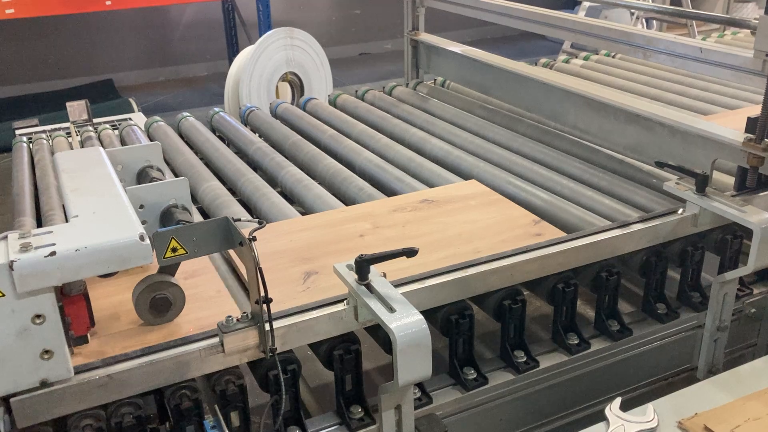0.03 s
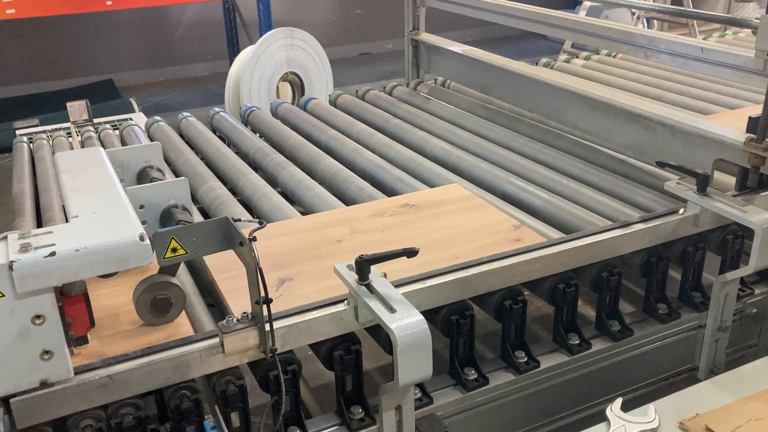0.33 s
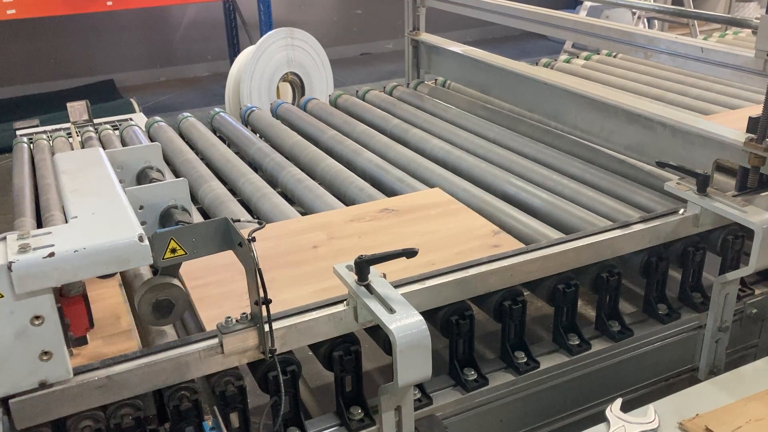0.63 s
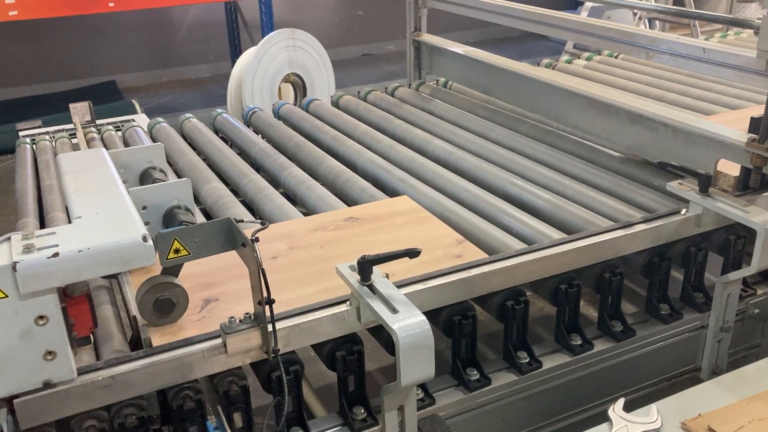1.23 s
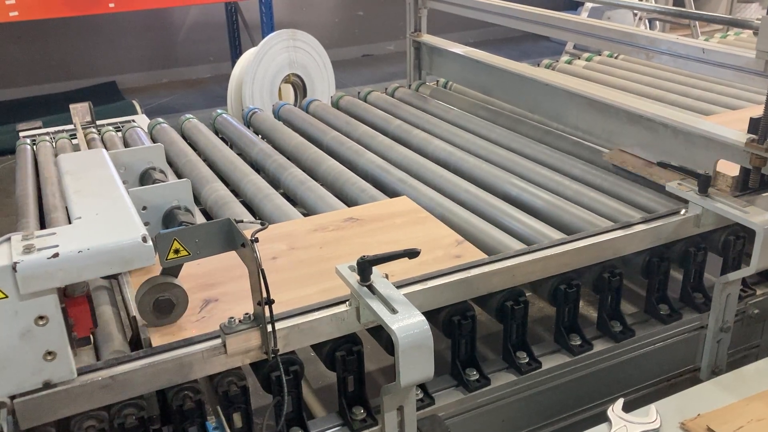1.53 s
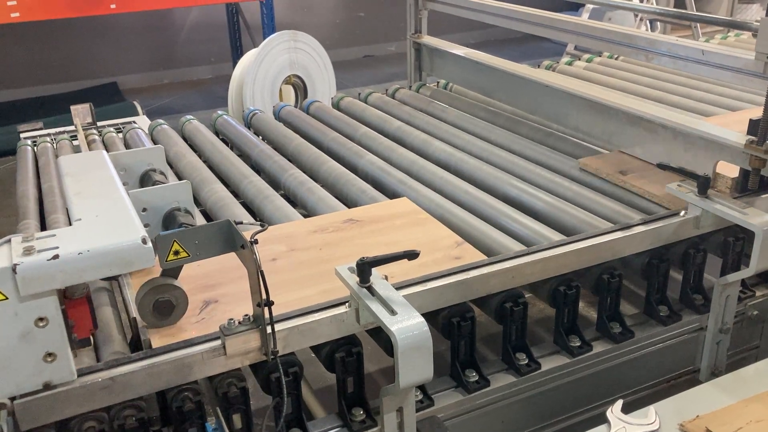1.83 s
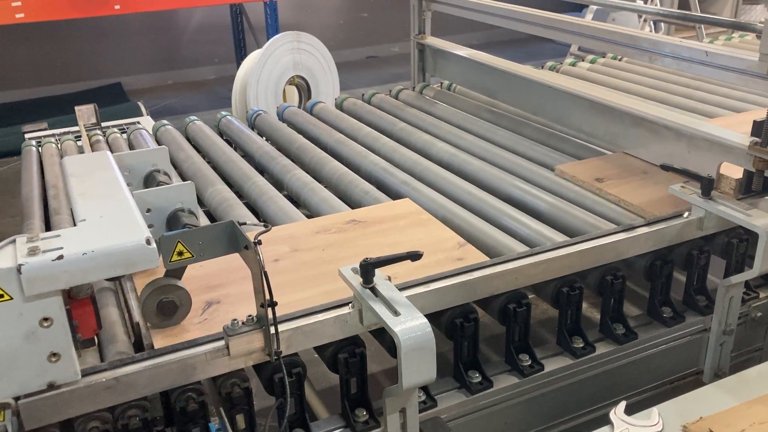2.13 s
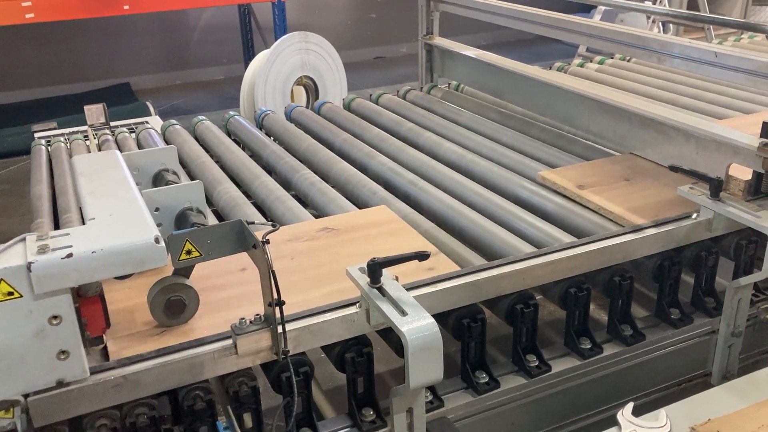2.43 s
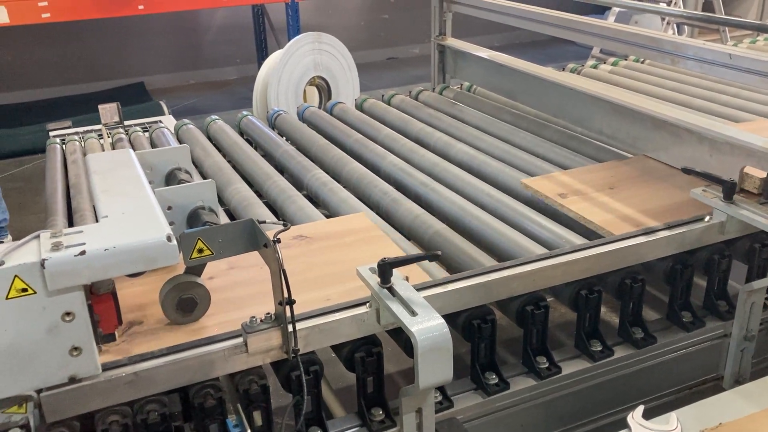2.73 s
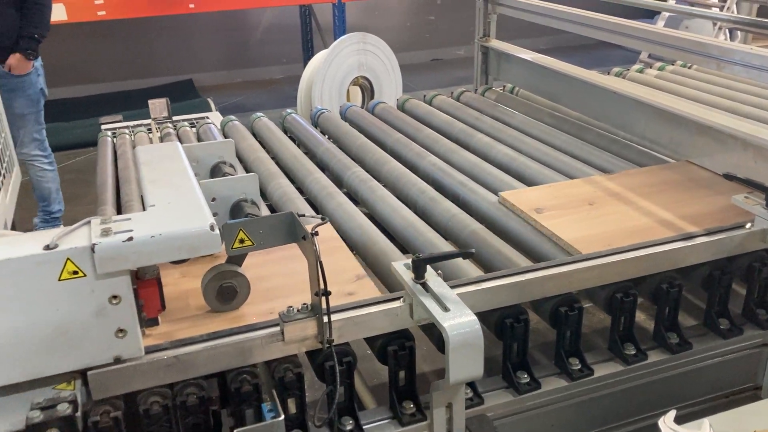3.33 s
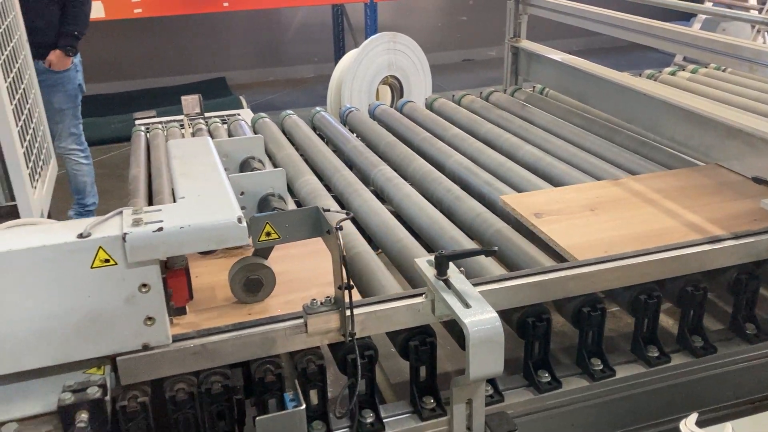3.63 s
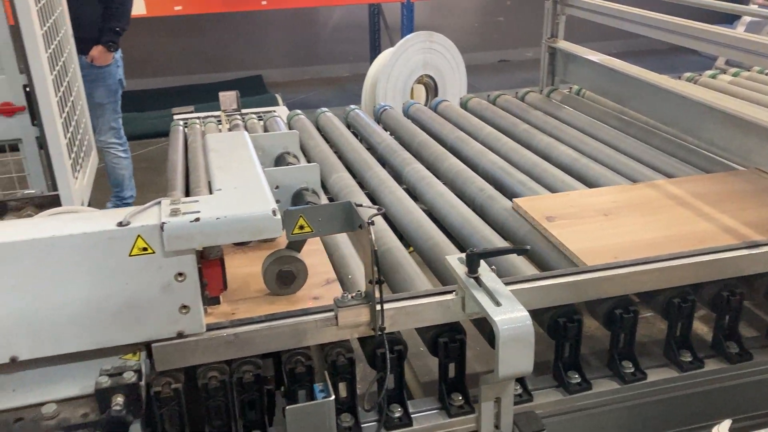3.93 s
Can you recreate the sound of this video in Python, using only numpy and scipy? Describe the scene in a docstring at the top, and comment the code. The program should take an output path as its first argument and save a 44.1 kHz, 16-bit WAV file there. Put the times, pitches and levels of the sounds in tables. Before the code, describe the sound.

A conveyor roller squeals unevenly after a brief scrape and snap, while factory machinery drones.

```python
"""A roller gives a thin, stuttering squeal on a factory machine that puts edging on panels.
It sings because it keeps gripping and slipping, and the hall echoes it. Just before it starts,
tools rub along a panel, then scrape and snap off its back edge. Later, panels bump on the conveyor.
The conveyor, the dust extractor and the motors drone throughout."""
import sys
import numpy as np
from scipy import signal
from scipy.fft import rfft, irfft
from scipy.io import wavfile
from scipy.ndimage import uniform_filter1d

SR = 44100
rng = np.random.default_rng(int(sys.argv[2]) if len(sys.argv) > 2 else 0)


def to_wav(sig):
    """Store sig (one row per channel, or 1-D mono) as 16-bit WAV at the path in sys.argv[1].

    Samples outside -1..1 are clipped; the rate is SR.
    """
    pcm = np.clip(np.atleast_2d(sig), -1, 1) * 32767
    pcm = np.round(pcm).astype(np.int16)
    wavfile.write(sys.argv[1], SR, pcm.T)  # frames by channels


N = 176400
T, HZ = np.arange(N) / SR, np.fft.rfftfreq(N, 1 / SR)


def amp(db):
    """Turns decibels into a gain to multiply by."""
    return 10 ** (np.asarray(db) / 20)


def unit(x):
    """Scales a signal to an average strength (rms) of 1."""
    return x / np.sqrt(np.mean(abs(x) ** 2) + 1e-20)


def level(points):
    """Gain over time from (t/s, level/dB) points."""
    return amp(np.interp(T, *np.transpose(points)))


def curve(points):
    """Joins (f/Hz, value) points along a log-frequency axis."""
    f, value = np.transpose(points)
    return np.interp(np.log(HZ + 1), np.log(f + 1), value)


def wander(rate_hz):
    """A smooth random wobble, up to about the given rate."""
    return unit(irfft(rfft(rng.standard_normal(N)) * (HZ > 0) / (1 + (HZ / rate_hz) ** 4), N))


def noise(gain):
    """Two unrelated noises with the given gain at each frequency."""
    return unit(irfft(rfft(rng.standard_normal((2, N))) * gain, N))


def decay(start, t60, attack_s):
    """A quick rise and a fade of 60 dB in t60 seconds."""
    age = np.maximum(T - start, 0)
    return np.minimum(age / attack_s, 1) * amp(-60 * age / t60)


def microphones(pair):
    """Blends two signals into left and right, partly alike and a little out of step."""
    # how alike the sides are: f/Hz, likeness (0 to 1)
    likeness = [(60, .998), (120, .98), (200, .92), (500, .7), (1000, .5), (1600, .3), (3500, .2),
                (6300, .25), (7200, .8), (9500, .98), (10400, .75), (11400, .95), (14300, .92)]
    # how far the left side is ahead: f/Hz, phase/rad
    lead = [(0, 0), (500, .7), (1000, 1.3), (1500, 2.7), (2900, 8.2), (3800, 8), (4800, 6.1), (5700, 3),
            (7100, 0), (9550, -3.7), (11400, -6.3), (14330, -10.3), (15600, -12.6)]
    left, other = rfft(pair)
    same = np.clip(curve(likeness), 0, 1)
    right = same * left + np.sqrt(1 - same ** 2) * other
    lag = np.exp(-1j * np.interp(HZ, *np.transpose(lead)))
    return irfft(np.array([left, right * lag]), N)


def hall(x, t60=0.66):
    """Two unrelated echoes of a sound, dying away in the hall."""
    tails = rng.standard_normal((2, SR // 2)) * amp(-60 * T[:SR // 2] / t60)
    return unit(signal.fftconvolve(x[None], tails, axes=1)[:, :N])


def machine_noise(spectrum, ripple_db, ripple_hz, patchy_db, flutter_db):
    """Noise coloured by the frame ringing at many pitches, fluttering in patches."""
    grid = np.arange(0, SR / 2, ripple_hz)
    ripple = np.interp(HZ, grid, rng.standard_normal(len(grid))) * HZ / (HZ + 300)
    steady = noise(amp(curve(spectrum) + ripple_db * ripple))
    slices = signal.stft(steady, nperseg=512)[2]
    patches = uniform_filter1d(rng.standard_normal(slices.shape[1:]), size=12, axis=0)  # blur in pitch
    patches = unit(uniform_filter1d(patches, size=6, axis=1))  # blur in time
    patchy = signal.istft(slices * amp(patchy_db * patches), nperseg=512)[1][:, :N]
    return unit(patchy * amp(flutter_db * wander(17)))


def drone():
    """The conveyor and the dust extractor make a steady rush."""
    # tone colour of the rush: f/Hz, level/dB
    colour = [(20, -35), (35, -19), (60, -5), (100, -8), (130, -6), (220, -0.5), (330, -5.5), (650, -6.5),
              (1000, -8.5), (1400, -10.5), (2300, -9.5), (3500, -12.5), (4500, -13.5), (5800, -20),
              (8500, -23), (11000, -20.5), (13000, -29), (15500, -54)]
    # its loudness: t/s, level/dB
    loudness = [(0, -24.5), (1.5, -27.5), (2.2, -28), (3, -28.5), (4, -29)]
    rush = machine_noise(colour, ripple_db=2.2, ripple_hz=22.3, patchy_db=1.5, flutter_db=0.16)
    return rush * level(loudness)


def motors(unload_s=0.64, easing_s=0.69):
    """Wavering motor tones, most easing off as the panel leaves the tools, and a fan's hum."""
    # motor tones: f/Hz, level/dB when working, level/dB when running free
    motor_tones = [(100, -50, -48.5), (199.1, -37, -43), (238.6, -36, -47.5), (358, -36, -50.5),
                   (451.8, -42.5, -49), (799, -38.5, -53), (1101.6, -33, -49.5), (1602, -47, -48.5),
                   (2450, -46, -76), (3999, -51, -72)]
    # the hum swells and sinks: t/s, level/dB
    fan_loudness = [(0, -43), (1.1, -48.5), (1.5, -39.5), (2.1, -44), (2.45, -39), (2.75, -49.5),
                    (3.1, -44.5), (3.55, -42), (4, -40.5)]
    fan_hz = 598.5
    free = np.clip((T - unload_s) / easing_s, 0, 1)
    tones = [(hz, amp(work_db + (free_db - work_db) * free)) for hz, work_db, free_db in motor_tones]
    out = np.zeros((2, N))
    for hz, gain in tones + [(fan_hz, level(fan_loudness))]:
        phase = 2 * np.pi * np.cumsum(hz * (1 + .001 * wander(5))) / SR
        flutter = amp(wander(4.8))  # about 1 dB
        out += gain * flutter * unit(np.array([np.sin(phase), np.cos(phase)]))
    return out


def panel_bumps():
    """Panels knock dully on the conveyor's rollers."""
    # knocks: t/s, level/dB
    knocks = [(2.761, -28), (3.777, -23), (3.789, -23.5), (3.822, -27)]
    # their tone colour: f/Hz, level/dB
    colour = [(25, -35), (60, -19), (150, -2), (250, 4.5), (600, -2), (1300, -2), (2500, -11), (5000, -20),
              (12000, -50)]
    return sum(amp(db) * decay(start, t60=0.29, attack_s=0.0024) * noise(amp(curve(colour)))
               for start, db in knocks)


def tool_rub():
    """The tools rub along the panel, then fade as it leaves."""
    # tone colour of the rubbing: f/Hz, level/dB
    colour = [(20, -26), (45, -7), (80, 1), (130, -5), (250, -2), (450, -4.5), (750, -8), (1200, -8),
              (1600, -6.5), (2600, -7), (4500, -14.5), (6000, -19), (8500, -24.5), (12000, -23),
              (15500, -35)]
    # its loudness: t/s, level/dB
    loudness = [(0, -22), (.3, -22), (.6, -21), (.77, -21), (.84, -26.5), (1.0, -27.5), (1.15, -26),
                (1.22, -33.5), (1.9, -44), (2.1, -111), (4, -81)]
    rub = machine_noise(colour, ripple_db=3.2, ripple_hz=25.06, patchy_db=1.95, flutter_db=0.93)
    return rub * level(loudness)


def scraper():
    """A scraper hisses along the edge in two quick bursts."""
    # tone colour of the hiss: f/Hz, level/dB
    colour = [(500, -21), (2000, -8), (4700, 8.5), (6000, -4.5), (8500, 0.5), (12000, -6), (15500, -5)]
    # its loudness: t/s, level/dB
    loudness = [(0, -55), (.57, -40), (.64, -17), (.69, -26.5), (.77, -18), (.84, -30), (.95, -35),
                (1.14, -39), (1.23, -49), (4, -75)]
    hiss = machine_noise(colour, ripple_db=-2.0, ripple_hz=80, patchy_db=2.9, flutter_db=4.5)
    return hiss * level(loudness)


def edge_snaps():
    """Tools strike the edge and chips flick away; the first blow sets the tool holder ringing."""
    # blows: t/s, level/dB, treble tilt/(dB per octave)
    blows = [(0.713, -18, -3), (.723, -15, 0.5), (.7842, -10.5, 7.5), (0.793, -23, 4), (0.894, -20, 0),
             (1.634, -28, 2), (2.103, -46, -3), (2.244, -29, 2), (2.545, -39, -1), (3.243, -29, 4)]
    # their tone colour before the tilt: f/Hz, level/dB
    colour = [(30, -35), (200, -10), (1000, 16), (3000, 8.5), (6000, 1), (11000, 2), (15500, -9.5)]
    # the holder's ringing tones: f/Hz, level/dB, t60/s
    holder_tones = [(3110, -24.5, 0.53), (3000, -22, 0.26), (4900, -15, .06)]
    out = np.zeros((2, N))
    for start, db, tilt_db in blows:
        body = decay(start, t60=0.064, attack_s=0.00026)
        tail = amp(-9) * decay(start, t60=0.11, attack_s=0.013)
        crack = amp(-4) * decay(start, t60=0.0042, attack_s=0.00017)
        burst = noise(amp(curve(colour) + tilt_db * np.log2(HZ + 500)))
        out += amp(db) * (body + tail + crack) * burst
    for hz, db, t60 in holder_tones:
        ring = np.sin(2 * np.pi * (hz * T + rng.random((2, 1))))
        out += amp(db) * decay(blows[0][0], t60, attack_s=.002) * ring
    return out


def faint_roller(hz=4193, jitter=0.0029):
    """A second roller joins in with a fainter, lower squeal."""
    # its loudness: t/s, level/dB
    loudness = [(0, -80), (1.7, -59), (2.0, -42), (2.75, -45), (3.3, -46), (4, -50)]
    tone = unit(np.sin(2 * np.pi * np.cumsum(hz * (1 + jitter * wander(33))) / SR))
    return unit((tone + hall(tone)) * amp(1.5 * wander(10))) * level(loudness)


def stick_slip(hz, drift=.0008, jitter=.0028, grit=.0035):
    """Phase of a rubbing roller whose pitch drifts and trembles."""
    speed = 1 + drift * wander(4.8) + jitter * wander(48.3) + grit * wander(420)
    return 2 * np.pi * np.cumsum(hz * speed) / SR


def chatter(rate_hz=13.3, depth_db=3):
    """A gain that pulses about once per turn of the roller, at an uneven rate."""
    phase = 2 * np.pi * np.cumsum(rate_hz * (1 + .25 * wander(5.1))) / SR
    return amp(depth_db * np.sin(phase))


def roller_squeal(hz=4779, rasp_db=-7, stutter_db=4.5):
    """A rubbing roller sings a raspy note with two overtones; its echoes beat against it."""
    # loudness of the note: t/s, level/dB
    note_loudness = [(.87, -58), (.92, -19.5), (1.02, -29.5), (1.08, -20.5), (1.14, -23), (1.185, -17),
                     (1.23, -26), (1.28, -20), (1.34, -22), (1.40, -16.5), (1.445, -29), (1.51, -22.5),
                     (1.59, -31.5), (1.635, -21), (1.75, -26.5), (1.79, -24), (1.9, -20), (1.96, -28),
                     (2.005, -16.5), (2.05, -30.5), (2.14, -26), (2.36, -26.5), (2.41, -36), (2.47, -17.5),
                     (2.505, -31.5), (2.54, -16.5), (2.575, -33), (2.65, -24), (2.74, -37), (2.83, -28.5),
                     (3.09, -30), (3.15, -26), (3.29, -25), (3.35, -35), (3.5, -25.5), (3.56, -31),
                     (3.74, -25), (3.88, -35.5), (3.97, -28.5), (4, -26)]
    # loudness of the overtones: t/s, level/dB
    overtone_loudness = [(.87, -58), (.9, -26.5), (1.13, -16.5), (1.5, -28), (1.95, -26), (2.2, -26.5),
                         (3.7, -27.5), (4, -33.5)]
    phase = stick_slip(hz)
    rasp = wander(20) * np.sin(phase) + wander(20) * np.cos(phase)  # noise close around the note
    tone = unit(np.sin(phase) * amp(wander(38))) + amp(rasp_db) * unit(rasp)
    note = unit((tone + amp(1) * hall(tone)) * chatter())
    overtones = 0
    for multiple, db in ((2, 0), (3, -7.5)):
        tone = unit(np.sin(multiple * phase) * amp(stutter_db * wander(45)))
        direct = np.array([tone, np.zeros(N)])
        overtones += amp(db) * unit(microphones(direct + amp(-2) * hall(tone)))
    return note * level(note_loudness) + overtones * level(overtone_loudness)


def scene():
    """All the sources together, in left and right."""
    machine = drone() + tool_rub() + scraper() + motors() + edge_snaps() + panel_bumps()
    return microphones(machine) + roller_squeal() + faint_roller()


def record(dry, start_s=.036, top_hz=16000):
    """Middle pitches lean to the left, the sound cuts in, and the highest treble is removed."""
    # how much louder the left side is: f/Hz, level/dB
    lean_db = curve([(60, -1.5), (160, -1.2), (350, 1.2), (700, 3.5), (1400, 1.0), (2800, -0.4),
                     (9000, -0.7)])
    leaning = irfft(rfft(dry) * amp(np.array([lean_db, -lean_db]) / 2), N)
    lowpass = signal.firwin(255, top_hz, window=("kaiser", 9), fs=SR)
    return signal.oaconvolve(leaning * (T >= start_s), lowpass[None], "same")


dry = scene()
out = record(dry)
to_wav(out)
```